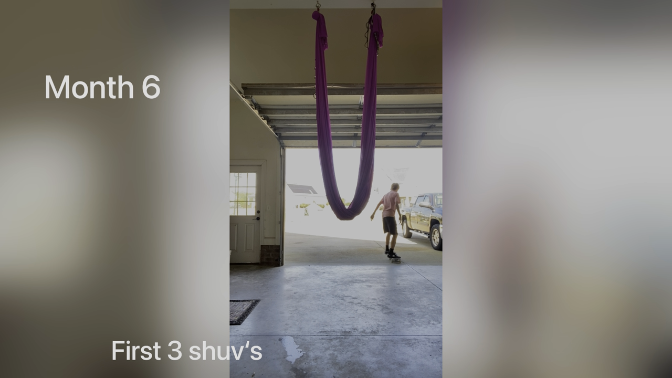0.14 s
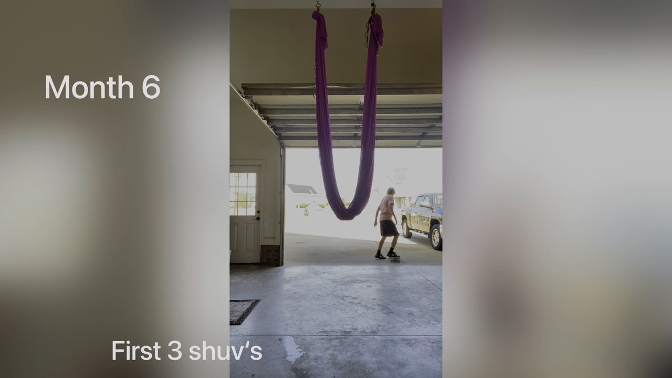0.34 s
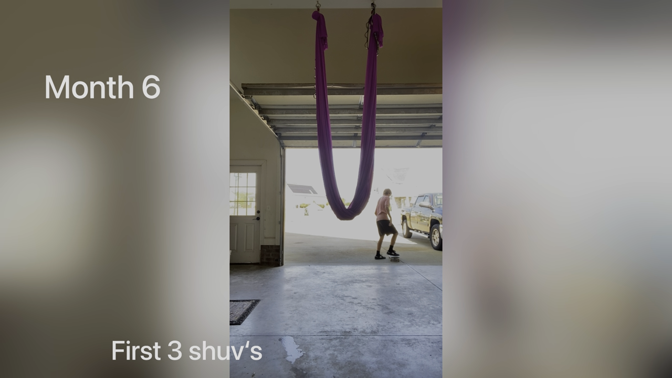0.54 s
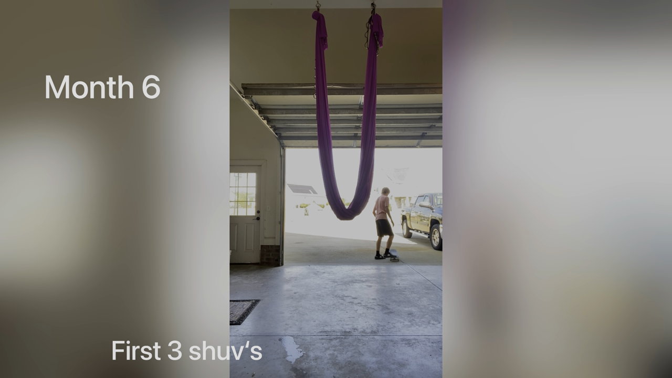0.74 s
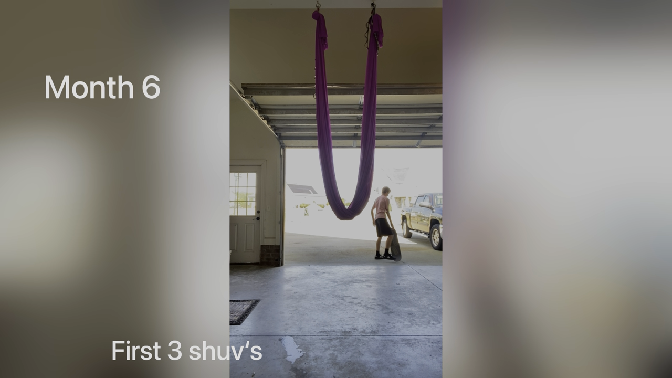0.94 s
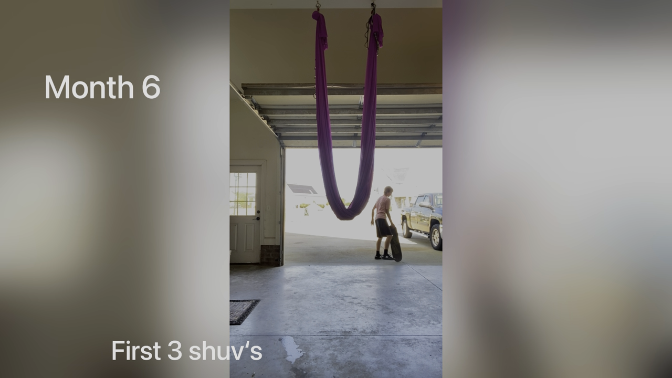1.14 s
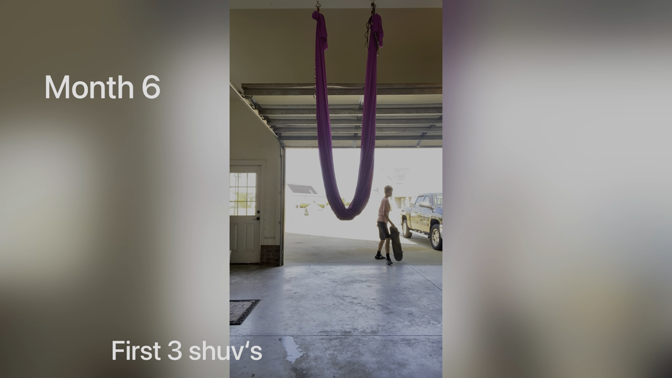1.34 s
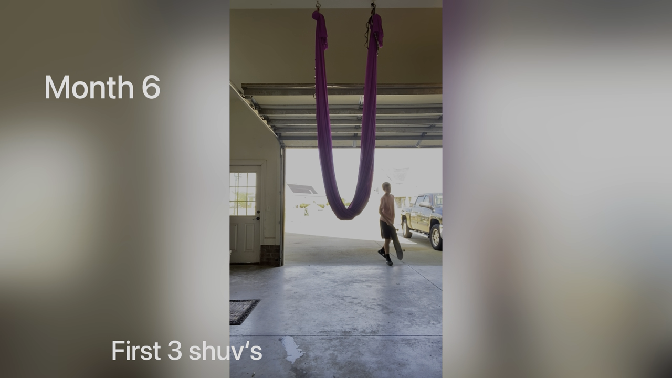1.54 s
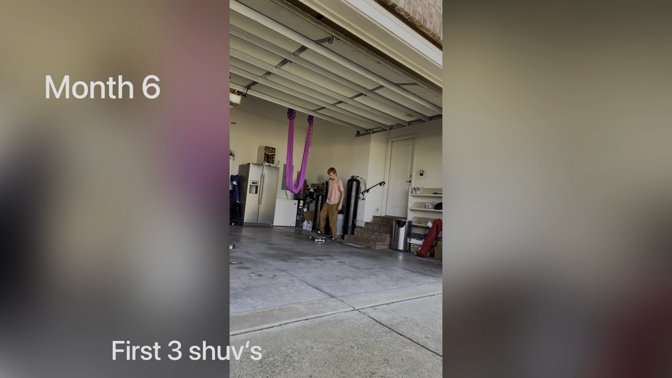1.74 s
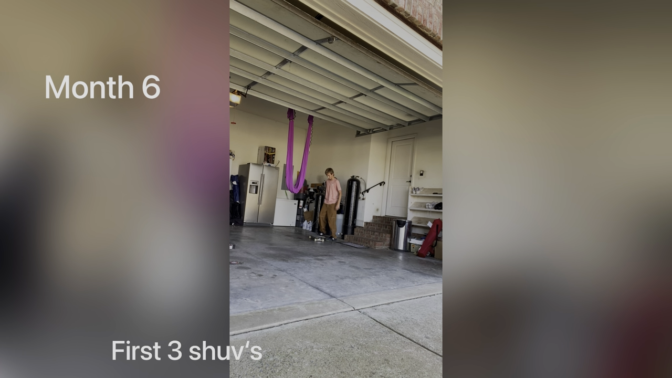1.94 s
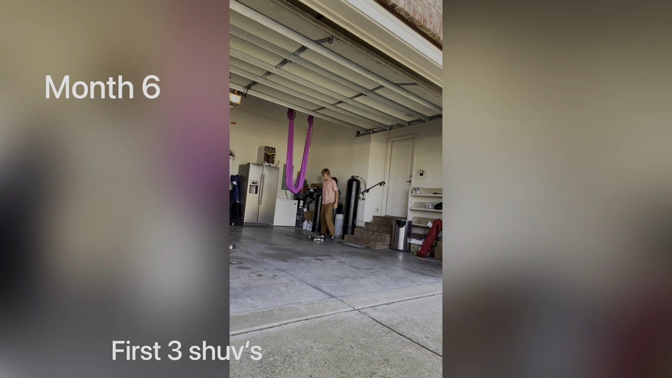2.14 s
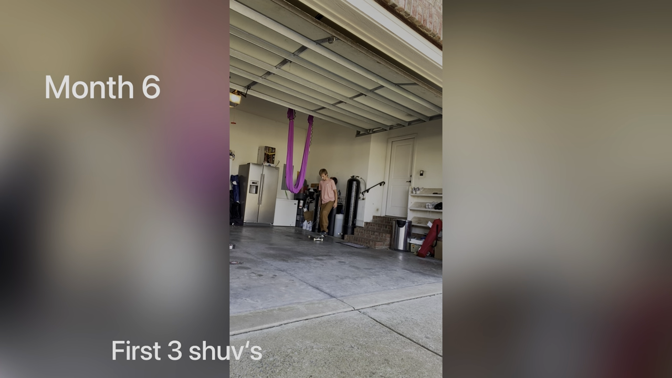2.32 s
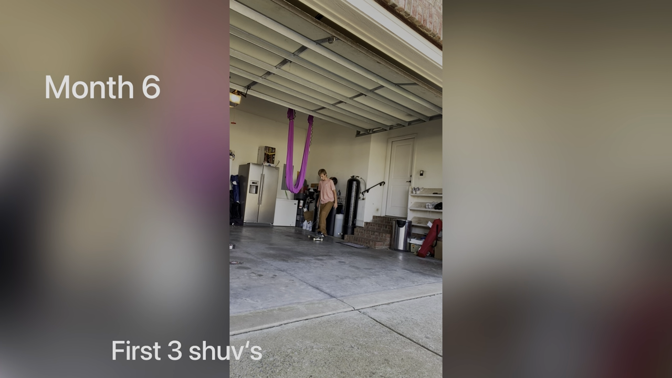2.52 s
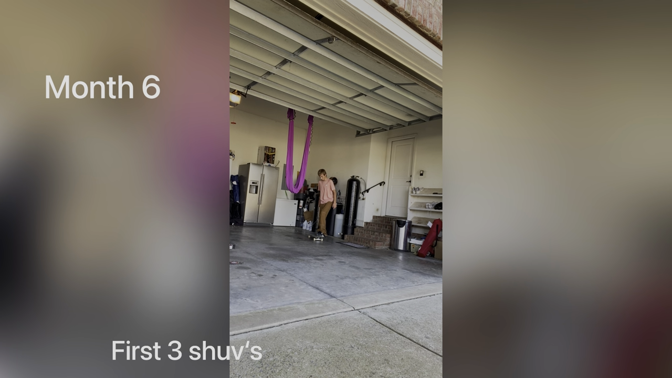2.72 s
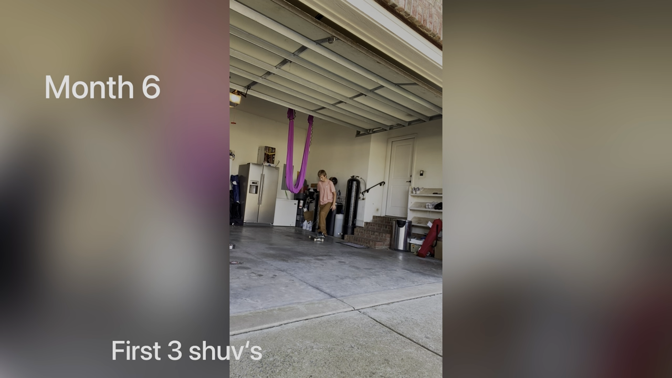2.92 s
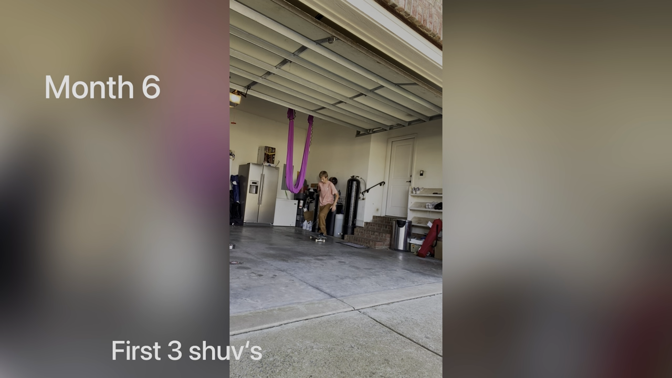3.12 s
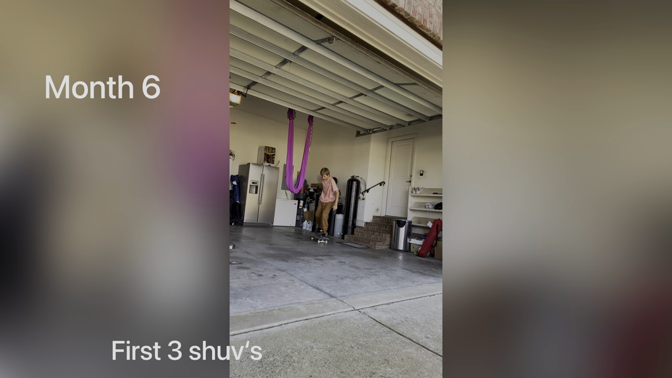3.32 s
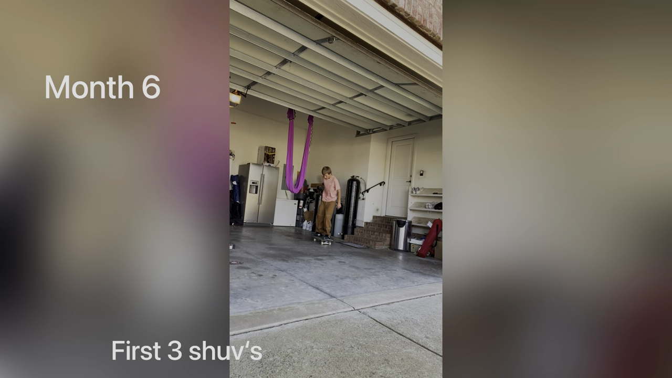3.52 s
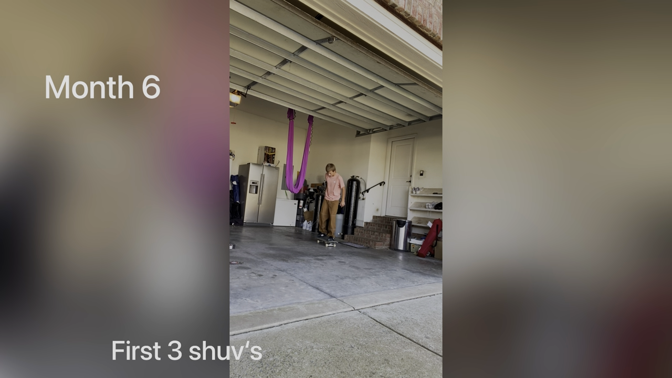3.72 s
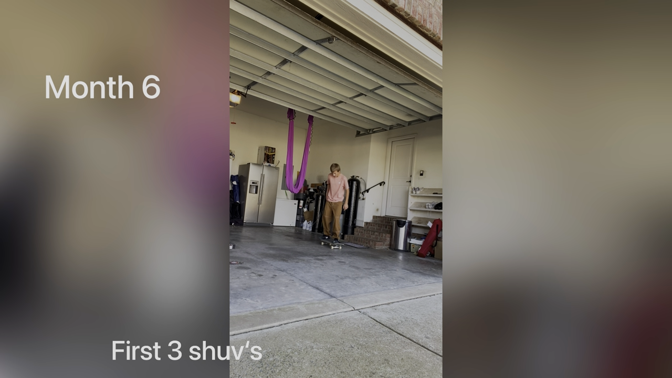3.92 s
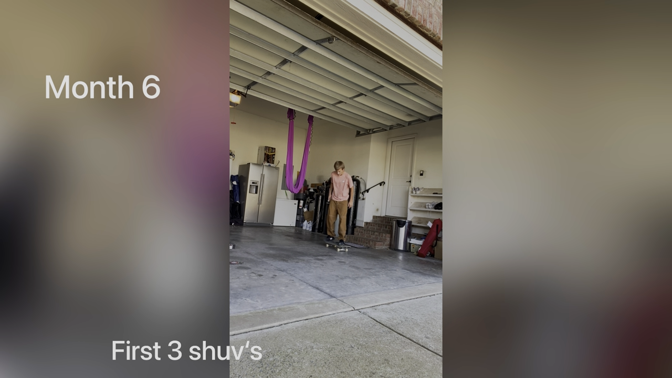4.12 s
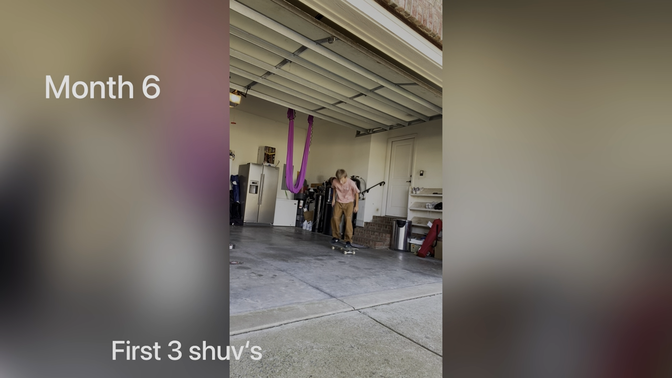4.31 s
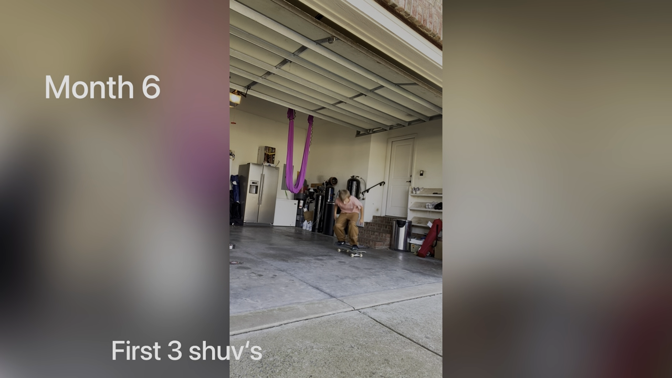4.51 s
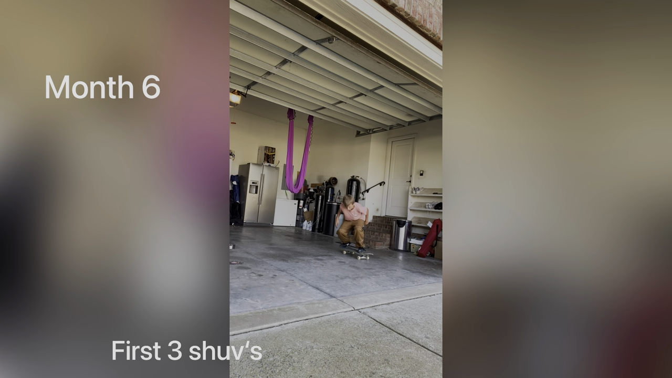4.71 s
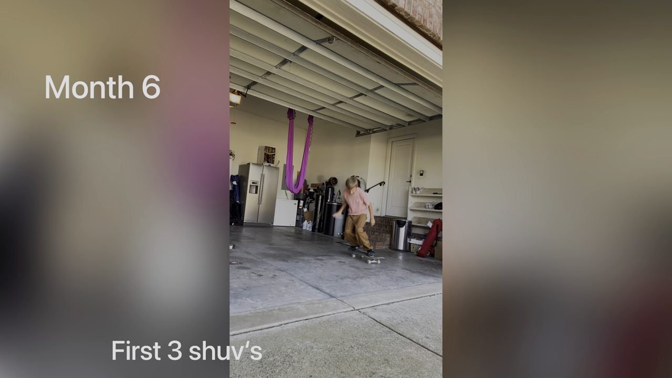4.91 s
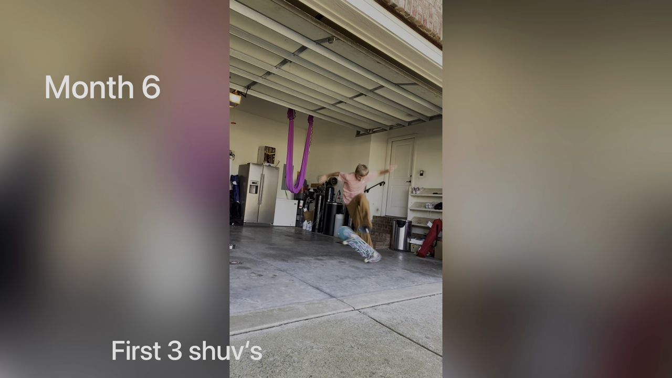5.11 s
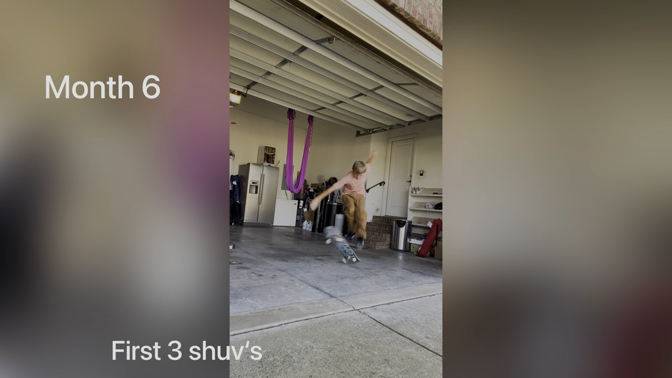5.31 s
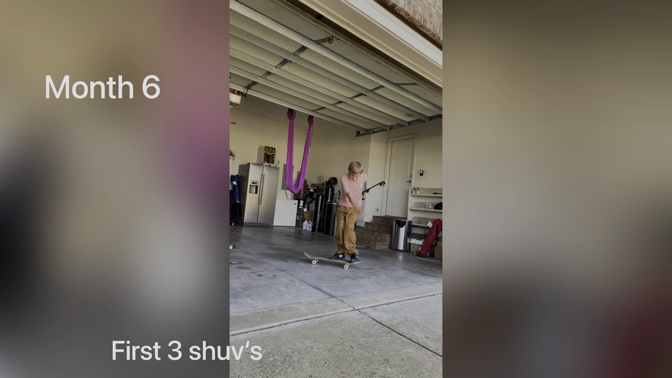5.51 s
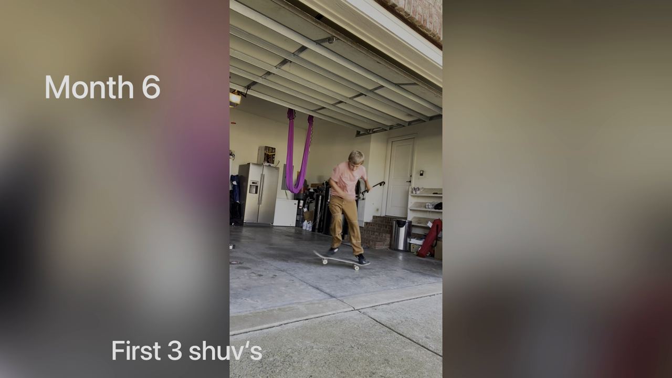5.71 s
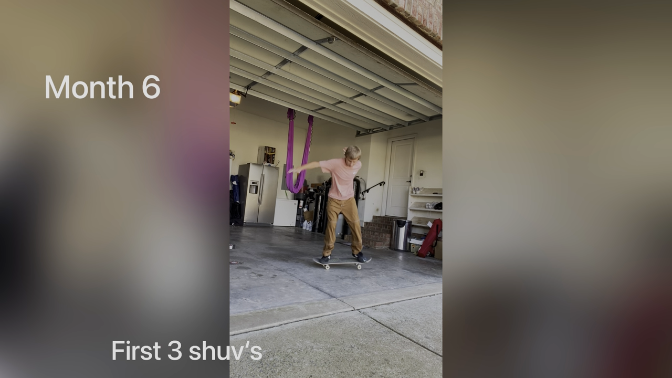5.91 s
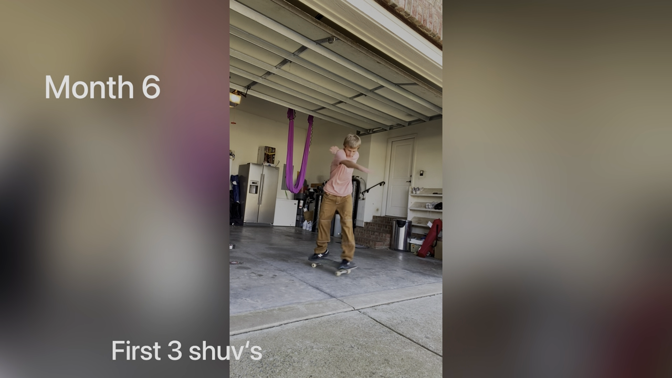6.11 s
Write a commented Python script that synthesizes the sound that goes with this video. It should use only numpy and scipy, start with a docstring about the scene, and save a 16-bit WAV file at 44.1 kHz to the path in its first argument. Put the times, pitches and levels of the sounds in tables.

```python
"""Two skateboard tries heard from a garage. First, out on the driveway, a board rolls, slaps and clatters
over a machine's hum and a bird. Then, indoors, shoes step on, wheels roll, the tail pops and the board lands.
Blows are noise cracks with ringing modes; wheels and soles are coloured random knocks; the bird is gliding
sines. Patches of fading noise make the garage's echo, and a microphone pair turns it all into stereo."""
import sys
import numpy as np
from scipy import signal
from scipy.fft import rfft, irfft, next_fast_len
from scipy.io import wavfile

SR = 44100
rng = np.random.default_rng(int(sys.argv[2]) if len(sys.argv) > 2 else 0)


def wav_record(signal):
    """Record a signal, one row per channel, as 16-bit PCM in the file named by sys.argv[1]."""
    frames = np.transpose(np.atleast_2d(signal))
    bounded = np.clip(frames, -1, 1)
    # unit amplitude maps onto the largest positive 16-bit level
    quanta = np.round(bounded * 32767).astype(np.int16)
    wavfile.write(sys.argv[1], SR, quanta)


N = 271215
TIME = np.arange(N) / SR   # seconds

# Low background noise outdoors and in. Each row: frequency in Hz, relative level in dB per Hz.
YARD_COLOUR = [(20, -24), (45, -12), (90, 7), (150, -8), (300, -5.5), (700, -24), (2400, -29), (3400, -25),
               (5000, -38), (6500, -41), (10000, -58)]
INDOOR_COLOUR = [(20, -21), (35, -12), (50, 1), (85, 0), (130, -6), (200, -9.5), (300, -22.5), (700, -23),
                 (2000, -32), (2800, -43), (4500, -42), (5500, -52), (10000, -58)]
# Rolling strength as the board's speed rises and falls. Each row: time in seconds, relative level in dB.
DRIVEWAY_ROLL = [(0.0, -47), (0.21, -46), (0.45, -49.5), (0.678, -51), (0.84, -48.5)]
GARAGE_ROLL = [(1.69, -55.5), (1.95, -59), (2.2, -59.5), (2.9, -60.5), (3.2, -51), (3.42, -48), (3.67, -44),
               (4.25, -43.5), (4.75, -48)]
# Colour of rolling on each ground, and of crushed grit. Each row: frequency in Hz, relative level in dB per Hz.
DRIVEWAY_COLOUR = [(130, -3), (220, -12), (350, -2.5), (470, -4), (620, -1), (900, -11), (1250, -13.5),
                   (1800, -10), (2300, -25.5), (3000, -25.5), (3700, -23), (4500, -50), (6000, -42)]
SLAB_COLOUR = [(130, -16), (235, -5), (295, -11.5), (490, 0.5), (600, -1), (830, -6.5), (1120, -3),
               (1500, -6), (2200, -10), (2900, -17), (3600, -25.5), (4600, -41.5), (6000, -37.5)]
GRIT_COLOUR = [(2000, -6.5), (3200, 11), (4600, 4), (6500, -8), (9000, -12.5), (11000, -22), (13500, -39)]
# The blows on concrete. Each row: start in seconds, relative level in dB, weight behind the blow in dB,
# highest frequency in Hz, deck ring in dB, ring length as a multiple of the usual, favoured frequency in Hz,
# its lift in dB, share that reaches the walls in dB.
BLOWS = [(.0615, -16.5, 7, 1250, -3.5, 1, 1050, 5, -3), (.079, -21.5, 8, 800, 1, 1, 560, 4, -4),
         (.089, -22, 11, 750, -5, 1, 560, 4, -3), (.144, -29, 7, 700, -2, 1, 500, 3, -5),
         (.225, -34.5, 2, 1500, -3, .7, 1750, 2, -6), (.266, -35, 2, 1400, -3, .7, 1700, 1, -6),
         (.303, -35, 1, 900, -1, .8, 650, 4, -6), (.333, -33, 5, 1800, -3, .7, 1800, 0, -5),
         (.586, -37, -2, 1600, -3, .7, 1750, 2, -6), (.672, -36, 6, 1300, -3, 1.2, 420, 3, 0),
         (.853, -8.5, -4, 3400, -6, .9, 1450, 0, -2), (.859, -12.5, 2.5, 1000, -6, 1, 295, 4, -4),
         (.9555, -19, 4, 2600, -3, 1, 1864, 0, -2), (.976, -27, 7, 900, -2, 1, 420, 5, -3),
         (1.044, -24.5, 9, 2200, -4, 1, 1850, 2, -3), (1.082, -27, 11, 2000, -7, 1.2, 520, 2, -2),
         (2.0095, -30.5, 2, 4500, -5, .9, 480, 1, -2), (2.459, -34, -1, 1100, -4, .8, 2300, 6, -1),
         (2.595, -31, -19, 700, -1, .8, 1900, 11, -5), (3.216, -47, -40, 12000, -15, 1, 11000, 4, 0),
         (3.4535, -25, 3, 2000, -6, 1, 500, 5, -1), (3.457, -20, -10, 5500, -13, .6, 2100, 7, -2),
         (3.479, -26, 2, 2200, -5, 1.3, 480, 10, 0), (4.957, -35, -22, 9000, -10, 1, 1100, 1, 1.5),
         (4.99, -27, -24, 9000, -11.5, 1, 1800, 1, 0), (5.039, -25, -18, 3500, -7.5, 1, 1500, 0, -1),
         (5.0852, -.5, -21, 3500, -15, .5, 2200, 1, -15), (5.0858, -8.5, -13, 1200, -12, .5, 950, 7, -14),
         (5.086, -27, 13, 400, -23, 1, 120, 1, -14), (5.3576, -2.5, -6, 6000, -8, .9, 2250, 2, -5.5),
         (5.361, -10, -4, 800, -2, 1, 620, 6, -5), (5.3735, -14, 0, 2200, -3, 1.1, 680, 3, -3),
         (5.423, 0, -5, 4200, -5, .9, 2600, 2, -6.5), (5.437, -2.5, -4.5, 10000, -5, .7, 660, 3, -7),
         (5.473, -12.5, -3, 3000, -2, 1, 700, 0, -6), (5.497, -14.5, .5, 2200, -1, 1.2, 640, 4, -5),
         (5.599, -13, -9, 2800, -3, .5, 2100, 1, -8), (5.602, -20, -8, 900, 2, .7, 640, 9, -8),
         (5.768, -12.5, -12, 4000, -15, .5, 2500, 3, -5), (5.769, -24, -5, 700, 0, .7, 650, 6, -7),
         (5.8032, -1, -24, 5500, -6, .8, 2050, 3, -7), (5.8055, -3.5, -10, 1400, 2, 1.3, 930, 4, -2),
         (5.83, -12, -1, 1600, 3, 1, 430, 3, -4), (5.858, -16.5, 2, 1400, 3, 1, 830, 1, -4),
         (6.088, -34, -17.5, 9000, -5.5, 1, 1600, 1, -4), (6.1275, -10.5, -12.5, 4400, -3, 1, 1044, 2, -1)]
# What the deck and trucks ring with.
# Each row: usual frequency in Hz, relative level in dB, usual time to fade by 60 dB in seconds.
DECK_MODES = [(435, -9, .13), (528, -7, .1), (645, -5, .148), (806, -5.5, .12), (964, -7, .065),
              (1055, -7, .07), (1197, -11.5, .06), (1335, -8, .08), (1630, -16.5, .051), (1835, -6, .0466),
              (1997, -6, .03), (2230, -6.5, .044), (2660, -17, .05), (3484, -12, .085)]
# The whole board bouncing on its wheels under the rider. Each row: the same as for the deck.
THUMP_MODES = [(92, -24, 0.21), (120, -22, 0.109), (200.5, -11.5, 0.0807), (261.6, -10, 0.06),
               (325.8, -10.5, 0.065), (421.8, -11.5, 0.07)]
# The crack of wood on concrete. Each row: frequency in Hz, relative level in dB per Hz.
CRACK_COLOUR = [(60, -27), (200, -14.5), (400, -1), (700, 8), (1300, -1.5), (2200, 2), (2900, -2),
                (3900, -6.5), (4700, -5.5), (5600, -7), (7000, -19.5), (9000, -21), (11000, -23),
                (13500, -24)]
# A bird outside.
# Each row: start in seconds, length in seconds, base pitch at start and end in Hz, relative level in dB.
CHIRPS = [(0.446, 0.0196, 2970, 2950, -49), (1.223, 0.048, 2900, 2856, -53),
          (1.277, 0.0984, 2850, 3125, -51), (1.417, .073, 3010, 3110, -52), (1.566, 0.058, 2850, 3080, -51)]
# Soles drag over grip tape and floor.
# Each row: start in seconds, rough length in seconds, relative level in dB, highest frequency in Hz.
SCUFFS = [(.655, .08, -48, 9000), (.84, .01, -40, 9000), (1.69, .068, -43, 12000), (1.744, .05, -42, 12000),
          (2.445, .03, -49, 4500), (3.21, .0386, -55, 9000), (3.442, .015, -40, 3000),
          (5.0742, .013, -20, 9000), (5.083, .0455, -38, 9000), (5.24, .1, -38, 3200),
          (5.347, .008, -30, 4000), (5.772, .0257, -32, 9000)]
# The colour of a dragging sole. Each row: frequency in Hz, relative level in dB per Hz.
SOLE_COLOUR = [(150, -24.5), (600, 3), (1100, -1), (1550, 3.5), (1900, 1), (2150, 2), (2380, 7.5),
               (2900, -9.5), (3500, -1.5), (4300, -12), (6500, -16), (9000, -24), (13000, -37)]
# The way from the driveway in through the open door. Each row: frequency in Hz, gain in dB.
DOORWAY = [(95, 6), (190, -6), (300, 2.5), (420, 2), (520, 4.5), (680, 2), (850, -5.5), (1150, -0.5),
           (1850, 1), (2450, -5), (2900, -1), (3700, 4.5), (5000, -2), (7000, 1.5), (11000, -8.5)]
# How fast the garage's echo dies. Each row: frequency in Hz, time to fade by 60 dB in seconds.
GARAGE_T60 = [(100, 0.02), (300, .5), (600, 0.4681), (1500, 0.5926), (3000, 0.57), (6000, .5),
              (12000, 0.3645)]
# The colour of that echo. Each row: frequency in Hz, gain in dB.
GARAGE_COLOUR = [(100, -2.5), (300, 0), (600, -.5), (1200, -1.5), (2500, 1), (5000, 3.5), (12000, -0.5)]
# How far the echoes differ between the microphones, for sounds indoors and from outside.
# Each row: frequency in Hz, side level against mid in dB.
APART_INSIDE = [(100, -20), (260, -11), (400, -10.5), (1100, -2.5), (2000, -12), (3200, -8.5), (4500, -9),
                (6000, -3.5), (8000, -6.5), (10000, -5), (12500, -12.5)]
APART_OUTSIDE = [(100, -20), (300, -10), (650, -12), (1100, 3), (1800, -7.5), (2500, -4.5), (7500, -10)]
# How the left microphone leads the right. Each row: frequency in Hz, lead in radians.
LEFT_LEAD = [(90, 0), (350, -0.48), (750, -1), (1100, 0), (1950, -1.0035), (2800, -1.6728), (3600, -1.47),
             (5000, -2), (5700, -2), (6400, -0.1), (7600, 0.1), (10000, -1.5), (12000, -3)]
# How much louder the left one is. Each row: frequency in Hz, left minus right in dB.
LEFT_LOUDER = [(60, 0.5), (270, 4.5), (650, 3.5), (1000, 2), (2000, 3.5), (2750, 6), (3700, 0.5),
               (4700, 2.6), (5950, -2), (6800, 0), (12600, 0)]

EDIT_S = 1.69   # the driveway gives way to the garage
POP_S, LANDING_S = 5.085, 5.36   # the tail strikes the ground; the board is down again
HUM_HZ, HUM_DB = 60.2, -49.5
STOP_S, IDLE_DB = .8045, -59.5   # on the driveway the board stops and only shifts about
PUSH_S, PUSH_DB = .3026, 16.5   # before the pop the legs press the wheels down harder and harder
AIR_DB = -53   # the wheels run on with no load during the jump
LANDED_DB, BRAKE_S, BRAKE_DB_PER_S = -33, 5.814, 64   # rolling away under the rider, then slowing
SPRAY_DB, SPRAY_S = -34, .0426   # grit scraped up by the tail
SPIN_DB, SPIN_FADE_DB_PER_S = -44, 2.5   # bearings hiss in the air
JUDDER_DB, JUDDER_RISE_S, JUDDER_FADE_S = -25, .0596, .0932   # wheels chatter on the ground after a blow
PITS_PER_S, PITS_DB = 24, -9.5   # pits and crumbs that make a wheel tick
# Slow wheels crush little grit: rolling level from which all is crushed; dB lost per dB below that.
GRIT_FULL_DB, GRIT_GROWTH = -46, .5
BLOW_DB = -1.5   # all blows together
LOWEST_HZ, WEIGHT_DB_PER_OCTAVE = 300, 10.5   # a weightier blow reaches further into the bass
RATTLE_DB, RATTLE_FOLLOWS = -19.5, .6954   # loose trucks, at a blow of 0 dB; dB per dB of the blow
FAVOUR_Q = 3.1   # the struck spot brings out one region of the deck's modes: its sharpness
CHIRP_ARCH_HZ = 40   # each chirp bulges upward in its middle
MOVE_S = .16   # the board travels far enough in this time to meet a new pattern of echoes
CUTOFF_HZ = 13000   # top of what the microphones pass


def from_db(db):
    """Turn decibels into gain."""
    return 10 ** (np.asarray(db) / 20)


def rms_one(x):
    """Scale a sound so that its rms level is 1."""
    return x / np.sqrt(np.mean(x ** 2) + 1e-20)


def at_hz(points, hz):
    """Read a table between its rows, with frequency on a log scale."""
    known, values = np.transpose(points)
    return np.interp(np.log(np.maximum(hz, 1)), np.log(known), values)


def coloured(x, spectrum):
    """Filter a sound by a colour table, falling steeply beyond its ends; rms 1."""
    size = next_fast_len(len(x))
    hz = np.fft.rfftfreq(size, 1 / SR) + 1
    below = 1 + (.7 * spectrum[0][0] / hz) ** 6
    above = 1 + (hz / spectrum[-1][0] / 1.2) ** 12
    gain = from_db(at_hz(spectrum, hz)) / np.sqrt(below * above)
    return rms_one(irfft(rfft(x, size) * gain, size)[:len(x)])


def drift(rate):
    """Wander smoothly between random values picked rate times a second."""
    knots = rng.standard_normal(4000)
    return np.interp(TIME * rate, np.arange(len(knots)), knots)


def add(track, s, sound):
    """Mix a sound into a track from time s on."""
    start = max(round(s * SR), 0)
    track[start:start + len(sound)] += sound[:N - start]


def edit(first, second):
    """Let the first try give way to the second within a hundredth of a second."""
    after = np.clip((TIME - EDIT_S) * 100 + 1, 0, 1)
    return first * (1 - after) + second * after


def ring(modes, t, spread_db, detune, length=1):
    """Struck modes fade as sines; strength and pitch vary with the spot struck and the feet's load."""
    hz, db, t60 = np.transpose(modes)[:, :, None]
    strength, shift = rng.standard_normal((2, len(modes), 1))
    signs = (-1) ** np.arange(len(modes))[:, None]
    level = signs * from_db(db + spread_db * strength)
    fade = np.exp(-np.log(1000) * t / (t60 * length))
    tone = np.sin(2 * np.pi * hz * (1 + detune * shift) * t)
    return np.sum(level * fade * tone, axis=0)


def grains(per_s, spread_db):
    """Scatter tiny knocks at random times, with random sign and uneven size."""
    sizes = from_db(spread_db * np.minimum(rng.exponential(1, N), 5)) * rng.choice([-1, 1], N)
    return sizes * (rng.random(N) < per_s / SR)


def background(yard_db=-57, indoors_db=-52):
    """A machine hums near the mains pitch in the first try; a dull rumble lies under both."""
    hum = from_db(HUM_DB) * np.sqrt(2) * np.sin(2 * np.pi * HUM_HZ * TIME)
    yard = from_db(yard_db) * coloured(rng.standard_normal(N), YARD_COLOUR)
    indoors = from_db(indoors_db) * coloured(rng.standard_normal(N), INDOOR_COLOUR)
    return edit(hum + yard, indoors)


def driveway_ride(stop_s=.076):
    """Strength of the rolling outside: the board coasts, then stops."""
    stopped = np.clip((TIME - STOP_S) / stop_s + 1, 0, 1)
    coasting = np.interp(TIME, *np.transpose(DRIVEWAY_ROLL))
    return from_db((1 - stopped) * coasting + stopped * IDLE_DB)


def judder():
    """Strength of the wheels' chatter: it swells and dies after every blow, with none in the jump."""
    power, t = np.zeros(N), np.arange(SR) / SR
    swell = (1 - np.exp(-t / JUDDER_RISE_S)) * np.exp(-t / JUDDER_FADE_S)
    for s, db, *_ in BLOWS:
        add(power, s, (from_db(db + JUDDER_DB) * swell) ** 2)
    on_ground = (TIME < POP_S) | (TIME > LANDING_S)
    return np.sqrt(power) * on_ground


def wheels(ride, hiss, surface, roll_db, judder_db, grit_db, deck_db, bumpy_db):
    """Wheels knock over rough concrete, tick in pits, shake the deck and crush grit; the load wobbles."""
    deck = ring(DECK_MODES, TIME[:SR // 10], spread_db=2.0, detune=.0102)
    shaken = from_db(deck_db) * rms_one(signal.fftconvolve(grains(800, 2.86), deck)[:N])
    ticks = from_db(PITS_DB) * coloured(grains(PITS_PER_S, 1.42), surface)
    knocks = coloured(grains(2000, 3.316), surface)
    strength = np.hypot(from_db(roll_db) * ride, from_db(judder_db) * judder())
    rumble = strength * (knocks + shaken + ticks)
    crushed = np.minimum(ride / from_db(GRIT_FULL_DB), 1) ** GRIT_GROWTH
    crackle = (from_db(grit_db) * ride * crushed + hiss) * coloured(grains(3000, 3.15), GRIT_COLOUR)
    wobble = from_db(bumpy_db * (drift(35) + drift(9)))
    return (rumble + crackle) * wobble


def crack(t, decay_s, press_s, count=3):
    """Contact noise dies fast; its fine shape is random, its colour that of wood on concrete."""
    press = 1 - np.exp(-t / press_s)
    burst = rng.standard_normal(len(t)) * press * np.exp(-t / decay_s)
    colour = from_db(at_hz(CRACK_COLOUR, np.fft.rfftfreq(len(t), 1 / SR)))
    # imposing the colour smears the burst in time, so colour and shape it by turns
    for _ in range(count):
        phase = np.angle(rfft(burst))
        burst = irfft(colour * np.exp(1j * phase), len(t)) * press * np.exp(-t / (10 * decay_s))
    return burst / np.sqrt(np.sum(burst ** 2))


def bent(x, corner_hz=900, count=6):
    """Higher bending waves cross the deck faster: all-pass filters delay the body behind the crack."""
    pole = np.exp(-2 * np.pi * corner_hz / SR)
    return signal.sosfilt(np.tile([-pole, 1, 0, 1, -pole, 0], (count, 1)), x)


def blows(crack_s=.0045, spread_s=.01, crack_db=15.5, ring_db=-8.7, thump_db=-6,
          rise_s=.00131, press_s=.0003, rattle_s=.0239):
    """A crack starts each blow, the deck rings and trucks rattle; gives direct sound and feed to the room."""
    direct, sent = np.zeros((2, N))
    t = np.arange(SR // 5) / SR
    hardware = coloured(grains(700, 3.01), CRACK_COLOUR)
    fill = 1 - np.exp(-t / rise_s)   # bending waves take a moment to fill the deck
    for s, db, weight_db, high_hz, deck_db, length, favoured_hz, lift_db, room_db in BLOWS:
        loose = rng.integers(0, N - len(t))
        deck = ring(DECK_MODES, t, spread_db=1.5, detune=.011, length=length)
        deck *= from_db(ring_db + deck_db)
        # the blow's own level is applied later, hence the minus one
        rattle_gain = from_db(RATTLE_DB + (RATTLE_FOLLOWS - 1) * db)
        rattle = rattle_gain * hardware[loose:loose + len(t)] * np.exp(-t / rattle_s)
        thump = from_db(thump_db + weight_db) * ring(THUMP_MODES, t, spread_db=1.0, detune=.0213) * fill
        # a soft contact lacks treble, a light one lacks bass
        low_hz = LOWEST_HZ * 2 ** (-weight_db / WEIGHT_DB_PER_OCTAVE)
        softness = signal.butter(1, min(high_hz, .45 * SR), fs=SR, output="sos")
        lightness = signal.butter(2, low_hz, "high", fs=SR, output="sos")
        touch = np.vstack([softness, lightness])
        # the walls get the crack from every side of the board, spread over a longer time
        for track, decay_s, level_db in (direct, crack_s, db), (sent, spread_s, db + room_db):
            contact = from_db(crack_db) * crack(t, decay_s, press_s) + fill * (deck + rattle)
            blow = bent(signal.sosfilt(touch, contact) + thump)
            favoured = signal.lfilter(*signal.iirpeak(favoured_hz, FAVOUR_Q, fs=SR), blow)
            add(track, s, from_db(level_db + BLOW_DB) * (blow + from_db(lift_db) * favoured))
    return np.array([direct, sent])


def from_outside(x):
    """The ground and the doorway colour sound that comes in from the driveway."""
    size = next_fast_len(N + SR // 10)
    gain = from_db(at_hz(DOORWAY, np.fft.rfftfreq(size, 1 / SR)))
    return irfft(rfft(x, size) * gain, size)[:, :N]


def garage(x, build_s=.00615):
    """Echoes build up and die band by band, in a new pattern every MOVE_S; both microphones share most."""
    t = np.arange(SR // 2) / SR
    hz = np.fft.rfftfreq(len(t), 1 / SR)
    # overlapping bands, each one full at its own row and silent at the others
    bands = np.array([at_hz([(band, band == centre) for band, _ in GARAGE_T60], hz)
                      for centre, _ in GARAGE_T60])
    bands = bands * from_db(at_hz(GARAGE_COLOUR, hz))
    fades = np.array([np.exp(-np.log(1000) * t / t60) for _, t60 in GARAGE_T60])
    fades = fades * (1 - np.exp(-(t / build_s) ** 2)) / np.sqrt(SR / 20)
    inside, outside = from_db(at_hz(APART_INSIDE, hz)), from_db(at_hz(APART_OUTSIDE, hz))
    mid, side = np.zeros((2, N))
    for s in np.arange(0, N / SR + MOVE_S, MOVE_S):
        # each piece of sound overlaps its neighbours
        here = np.abs(TIME - s) < MOVE_S
        piece = x[here] * np.cos(np.pi / 2 * (TIME[here] - s) / MOVE_S)
        for track, share in (mid, 1), (side, outside if s < EDIT_S else inside):
            noise = rfft(rng.standard_normal(len(t)))
            response = np.sum(irfft(noise * share * bands, len(t)) * fades, axis=0)
            add(track, s - MOVE_S, signal.fftconvolve(piece, response))
    return np.array([mid + side, mid - side])


def bird(trill_hz=62, swing_hz=110, waver_hz=35, rasp_db=2.2):
    """Sines glide in arched chirps, with a quick trill in pitch and a slight rasp in level."""
    out, waver, rasp = np.zeros(N), drift(500), from_db(rasp_db * drift(1200))
    for s, length, start_hz, end_hz, db in CHIRPS:
        on = (TIME > s) & (TIME < s + length)
        t = TIME[on] - s
        arch = np.abs(np.sin(np.pi * t / length))
        glide = start_hz + (end_hz - start_hz) * t / length + CHIRP_ARCH_HZ * arch
        trill = swing_hz * np.sin(2 * np.pi * trill_hz * t)
        hz = glide - trill + waver_hz * waver[on]
        tone = np.sin(2 * np.pi * np.cumsum(hz) / SR)
        out[on] += from_db(db) * np.sqrt(arch) * rasp[on] * tone
    return out


def shoes():
    """A sole drags in dense small slips; each drag has its own highest frequency."""
    slips, out = coloured(grains(6000, 3.6), SOLE_COLOUR), np.zeros(N)
    for s, length, db, high_hz in SCUFFS:
        moments = [0, .008, .0063 + length, .0171 + length]   # seconds from the start
        pressure = from_db(db) * np.interp(TIME - s, moments, [0, 1, .462, 0])
        lowpass = signal.butter(2, min(high_hz, .45 * SR), fs=SR)
        out += pressure * signal.lfilter(*lowpass, slips)
    return out


def garage_ride(touch_s=.163):
    """Strength of the rolling indoors: run-up, push, jump, landing and slowing."""
    push = PUSH_DB * np.clip((TIME - POP_S) / PUSH_S + 1, 0, 1)
    run_up = np.interp(TIME, *np.transpose(GARAGE_ROLL)) + push
    away = LANDED_DB - BRAKE_DB_PER_S * np.maximum(TIME - BRAKE_S, 0)
    landed = np.clip((TIME - LANDING_S) / touch_s + 1, 0, 1)
    return from_db(np.where(TIME < POP_S, run_up, (1 - landed) * AIR_DB + landed * away))


def jump_hiss():
    """Strength of the treble from pop to landing: a spray of grit dies away over spinning bearings."""
    t = np.maximum(TIME - POP_S, 0)
    in_air = (t > 0) * (TIME < LANDING_S)
    spray = from_db(SPRAY_DB) * np.exp(-t / SPRAY_S)
    spin = from_db(SPIN_DB - SPIN_FADE_DB_PER_S * t)
    return in_air * (spray + spin)


def scene():
    """Mix board, shoes and bird, direct and through the garage, over the background."""
    struck = blows()
    hits, hits_sent = edit(from_outside(struck), struck)
    driveway = wheels(driveway_ride(), 0, DRIVEWAY_COLOUR, roll_db=1, judder_db=0, grit_db=-20,
                      deck_db=-14, bumpy_db=2.0)
    slab = wheels(garage_ride(), jump_hiss(), SLAB_COLOUR, roll_db=-.3758, judder_db=-1, grit_db=-14.5,
                  deck_db=-15.5, bumpy_db=.56)
    wheels_and_shoes = edit(driveway, slab) + shoes()
    chirps = bird()
    echo = garage(from_db(2) * hits_sent + from_db(-1) * wheels_and_shoes + from_db(-8) * chirps)
    return hits + from_db(-2) * wheels_and_shoes + from_db(-1) * chirps + echo + background()


def record(dry):
    """The microphone pair differs in phase and level; high peaks are rounded and the top is cut."""
    size = next_fast_len(N + SR // 10)
    hz = np.fft.rfftfreq(size, 1 / SR)
    # half of the difference goes to each side, in opposite directions
    half = from_db(at_hz(LEFT_LOUDER, hz) / 2) * np.exp(.5j * at_hz(LEFT_LEAD, hz))
    pair = irfft(rfft(dry, size) * np.array([half, 1 / half]), size)[:, :N]
    rounded = pair / (1 + (pair / .92) ** 4) ** .25
    return signal.sosfilt(signal.ellip(10, .1, 80, CUTOFF_HZ, fs=SR, output="sos"), rounded)


dry = scene()
out = record(dry)
wav_record(out)
```